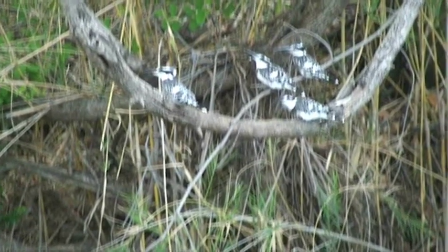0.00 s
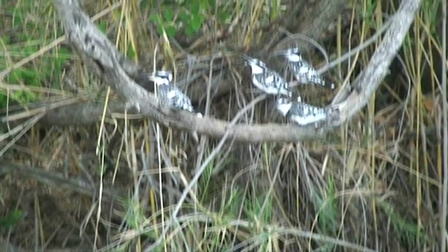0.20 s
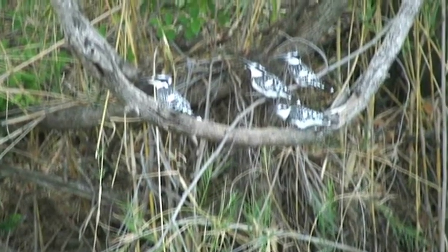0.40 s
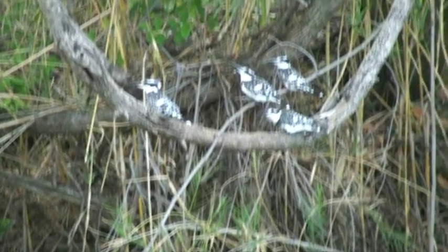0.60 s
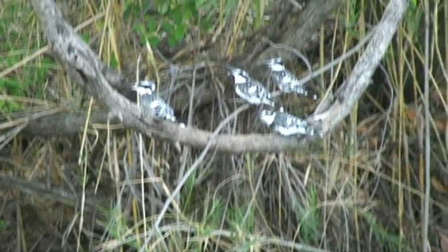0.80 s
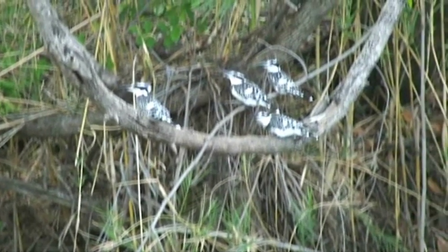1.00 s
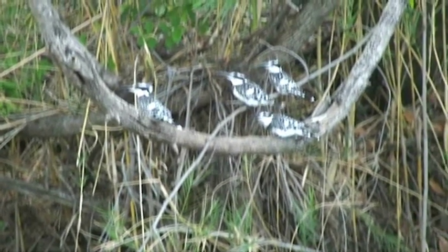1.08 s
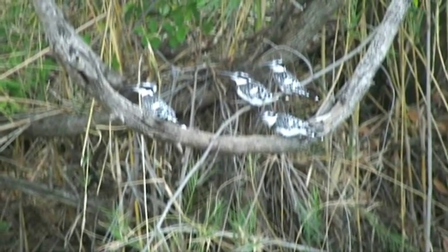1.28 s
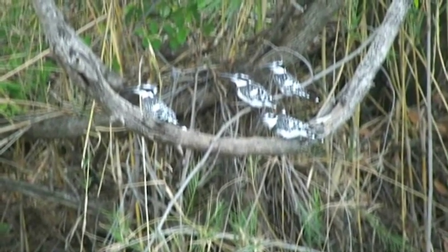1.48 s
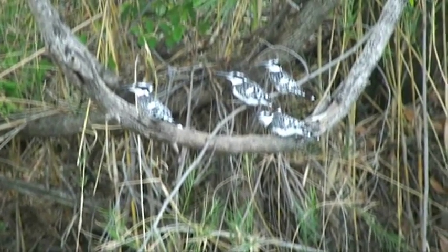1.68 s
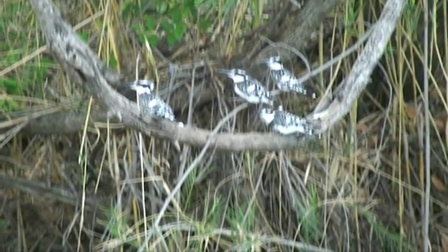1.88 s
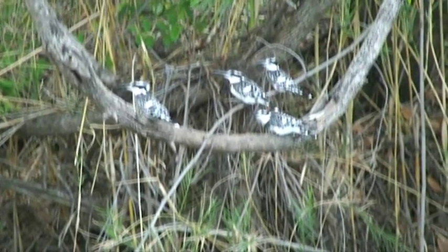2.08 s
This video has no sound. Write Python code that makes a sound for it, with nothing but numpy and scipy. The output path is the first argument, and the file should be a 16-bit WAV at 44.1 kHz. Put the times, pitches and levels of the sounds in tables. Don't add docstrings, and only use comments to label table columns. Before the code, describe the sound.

Close kingfisher's piercing chirps and rapid chips beside a rushing river, then two faint distant notes

```python
import sys
import numpy as np
from scipy import signal
from scipy.fft import rfft, irfft, next_fast_len
from scipy.io import wavfile
from scipy.ndimage import uniform_filter1d, map_coordinates

SR = 44100
rng = np.random.default_rng(int(sys.argv[2]) if len(sys.argv) > 2 else 0)


def wav_out(sig):
    wavfile.write(sys.argv[1], SR, np.round(np.clip(np.atleast_2d(sig).T, -1, 1) * 32767).astype(np.int16))


def boost_factor(decibels):
    exponent = np.asarray(decibels, float) / 20
    return 10 ** exponent


N = 97020

# f/Hz, t60/s
REEDS = [(3000, 0.2), (5000, 0.23), (10000, 0.28)]


def unit(x):
    return x / np.sqrt(np.mean(x ** 2) + 1e-20)


def along(points, hz):
    f, v = np.transpose(points)
    return np.interp(np.log(hz + 1), np.log(f + 1), v)


def wobble(rate):
    knots = rng.standard_normal(int(N * rate / SR) + 4)
    return map_coordinates(knots, [np.arange(N) * rate / SR])


def noise(gain):
    m = next_fast_len(N)
    spectrum = rfft(rng.standard_normal(m)) * gain(np.fft.rfftfreq(m, 1 / SR))
    return unit(irfft(spectrum, m)[:N])


def coloured(points):
    return noise(lambda hz: boost_factor(along(points, hz)) * (hz > points[0][0] / 2))


def resonant(centre, width):
    return noise(lambda hz: 1 / (1 + ((hz - centre) / width * 2) ** 2))


def river():
    # f/Hz, level/dB per Hz
    hiss_mid = [(200, -8), (450, -5.5), (800, -9.5), (1500, -14.5), (2600, -21), (6300, -25),
                (10000, -37.5), (15000, -57.5)]
    # f/Hz, level/dB per Hz
    hiss_side = [(200, -19), (450, -10.5), (850, -11), (1500, -17.5), (3000, -24), (6300, -28.5),
                 (10000, -36), (15000, -67)]
    # f/Hz, level/dB per Hz
    rumble = [(12, -21), (20, -1), (64, -2.5), (82, -2), (155, -1), (300, -13.5), (390, -7), (660, -120)]
    hiss = boost_factor(-42 + 0.17 * wobble(3.6)) * coloured(hiss_mid)
    low = boost_factor(-42.5 + 0.65 * wobble(5.2)) * coloured([*rumble, (600, -48.5)])
    mid = hiss + low
    side = boost_factor(-48.5) * coloured(hiss_side)
    return np.array([mid + side, mid - side])


def motor():
    # f/Hz, width/Hz, mid level/dB, side level/dB
    resonances = [
        (432, 40, -59.5, -60.5),
        (597.8, 20.4, -46.5, -53),
        (772, 67, -54.5, -56.5),
    ]
    like = -0.15
    out = np.zeros((2, N))
    for hz, width, mid_db, side_db in resonances:
        mid = resonant(hz, width)
        side = like * mid + np.sqrt(1 - like ** 2) * resonant(hz, width)
        out += boost_factor(mid_db) * mid + boost_factor(side_db) * side * [[1], [-1]]
    return out


def wind():
    # t/s, strength/dB
    gusts = [(0, -36), (.12, -45), (.35, -34), (.5, -54), (.85, -49), (1.05, -52), (1.4, -49), (1.6, -57),
             (2.2, -55)]
    # f/Hz, level/dB per Hz
    buffet = [(15, -8.5), (35, 10.5), (70, 2.5), (130, -9.5), (250, -38)]
    s, db = np.transpose(gusts)
    strength_db = np.interp(np.arange(N) / SR, s, db) - 1.5
    ports = []
    for more_db in (2, 0):
        lumps_db = 4.5 * wobble(7.55)
        ports.append(boost_factor(strength_db + more_db + lumps_db) * coloured(buffet))
    return np.array(ports)


def whistle(rows, overtones_db, flutter_db):
    # f/Hz, level/dB
    throat = [(6500, 1), (7600, 1.5), (8500, 2), (9400, -3.5), (10000, -8), (11000, -1.5), (13000, 0),
              (15000, -10)]
    overtone_grows, full_effort_db = 0.4, -12
    s, hz, db = np.transpose(rows)
    t = np.arange(N) / SR
    pitch = uniform_filter1d(np.interp(t, s, hz), size=45)
    effort_db = np.interp(t, s, db)
    level = uniform_filter1d(boost_factor(effort_db) * (t > s[0]) * (t < s[-1]), size=45)
    thin_db = overtone_grows * (effort_db - full_effort_db)
    phase = 2 * np.pi * np.cumsum(pitch) / SR
    tone = np.sin(phase)
    for k, over_db in zip((2, 3), overtones_db):
        gain = boost_factor(over_db + thin_db + along(throat, k * pitch))
        audible = k * pitch < SR / 2
        tone += gain * audible * np.sin(k * phase)
    flutter = boost_factor(flutter_db * wobble(300))
    return level * flutter * tone


def arch(s, length, hz, top, db, drop):
    u = np.linspace(0, 1, num=24)
    rising = u < top
    away = np.where(rising, 1 - u / top, (u - top) / (1 - top)) ** 2
    pitch = hz * (1 - np.where(rising, *drop) * away)
    return np.transpose([s + u * length, pitch, db - 14.5 * away])


def chip(s, length, hz, fall, db):
    # f/Hz, level/dB
    chip_throat = [(2400, -14), (3300, -13.5), (3800, -3), (4500, 0.5), (5500, -1.5), (6800, -20)]
    peak_at, rise_db, fall_db = 0.42, 3, 7.5
    u = np.linspace(0, 1, num=40)
    pitch = hz - fall * 1000 * length * (u - 0.31 * u ** 4)
    before_db = rise_db * (1 - u / peak_at) ** 4
    after_db = fall_db * (u - peak_at) / (1 - peak_at)
    level = db - np.where(u < peak_at, before_db, after_db)
    return np.transpose([s + u * length, pitch, level + along(chip_throat, pitch)])


def tail(t60s, delay_s, rise_s):
    hz, t, z = signal.stft(rng.standard_normal((2, SR // 2)), SR, nperseg=128)
    decay = boost_factor(-60 * t / along(t60s, hz)[:, None])
    x = signal.istft(z * decay, SR, nperseg=128)[1]
    late = np.clip(np.arange(x.shape[1]) / SR - delay_s, 0, None)
    x = x * (1 - np.exp(-late / rise_s))
    return x / np.linalg.norm(x[0]) * boost_factor([[0], [-9]])


def perched(x, pan, echo):
    mid, side = signal.fftconvolve(x[None], echo, axes=1)[:, :N]
    heard = x + np.array([mid + side, mid - side])
    tilt_db = along(pan, np.fft.rfftfreq(N, 1 / SR)) / 2
    return irfft(rfft(heard) * boost_factor([tilt_db, -tilt_db]), N)


def near_birds():
    # t/s, f/Hz, effort/dB
    whistle_a = [(.2355, 7120, -54), (.238, 7240, -31), (.246, 5900, -18), (.254, 4570, -12.5),
                 (.264, 4190, -11), (.277, 3880, -14), (.283, 3740, -21.5), (.309, 3600, -20),
                 (.327, 2870, -37.5)]
    # t/s, f/Hz, effort/dB
    lead_in = [(0.349, 5690, -38), (.353, 5650, -22), (0.359, 6070, -31), (0.3615, 7460, -28),
               (0.364, 7700, -28), (.365, 7400, -50)]
    # t/s, f/Hz, effort/dB
    whistle_b = [(0.364, 6520, -37), (.365, 6275, -14.5), (.369, 5540, -17), (0.372, 4754, -7.5),
                 (.381, 3800, -17), (.388, 3290, -24), (.398, 3044, -30.5), (0.411, 2950, -30),
                 (0.411, 2900, -43)]
    # start t/s, length/s, top f/Hz, top at share of length, peak level/dB
    arches = [
        (0.493, 0.0156, 4747, 0.35, -14),
        (0.659, .017, 4110, 0.42, -20),
    ]
    arch_drops = [(0.24, 0.104), (.12, 0.47)]
    # start t/s, length/s, top f/Hz, top at share of length, peak level/dB
    ticks = [
        (0.522, 0.012, 7320, .5, -33),
        (0.577, .006, 7100, 0.41, -32),
    ]
    tick_drop = (0.059, .04)
    # start t/s, length/s, first f/Hz, fall/Hz per ms, peak level/dB
    chips = [
        (.528, .026, 6025, 162.3, -12.5),
        (.579, 0.018, 5690, 232, -16.5),
        (.621, .022, 6820, 256.7, -15),
    ]
    near_overtones = [-15, -28]
    # f/Hz, level/dB
    near_pan = [(3000, -4), (5000, -2.5), (6500, -3.5), (9000, 3.5), (13000, .3)]
    # f/Hz, t60/s
    bank = [(3000, 0.57), (5000, 0.52), (10000, 0.58)]
    notes = [whistle_a, lead_in, whistle_b]
    notes += [arch(*row, drop) for row, drop in zip(arches, arch_drops)]
    notes += [arch(*row, tick_drop) for row in ticks]
    notes += [chip(*row) for row in chips]
    out = np.zeros((2, N))
    for note in notes:
        echo = boost_factor(-6) * tail(REEDS, 0.0032, 0.0052) + boost_factor(-18) * tail(bank, 0.033, 0.014)
        out += perched(whistle(note, near_overtones, -0.76), near_pan, echo)
    return out


def lap():
    start_s, length_s = 1.17, 0.21
    u = np.clip((np.arange(N) / SR - start_s) / length_s, 0, 1)
    return boost_factor(-41.5) * np.sin(np.pi * np.sqrt(u)) * resonant(173, 110)


def far_birds():
    # t/s, f/Hz, effort/dB
    call_a = [(1.345, 4200, -51), (1.364, 4250, -52), (1.371, 4580, -34), (1.374, 6310, -37),
              (1.379, 7760, -46), (1.383, 6300, -34), (1.386, 4435, -40.5), (1.402, 4200, -41),
              (1.417, 4180, -47)]
    # t/s, f/Hz, effort/dB
    octave_a = [(1.384, 10250, -52), (1.387, 8800, -43.5), (1.392, 8440, -44), (1.414, 8600, -57)]
    # t/s, f/Hz, effort/dB
    loop_b = [(1.993, 3440, -50), (2.001, 4960, -37.5), (2.005, 5710, -43), (2.009, 6450, -44),
              (2.015, 6660, -44), (2.020, 6280, -55), (2.023, 5560, -44), (2.0255, 4700, -35),
              (2.028, 4700, -46)]
    # t/s, f/Hz, effort/dB
    hook_b = [(2.027, 4800, -46), (2.031, 5080, -45), (2.036, 5060, -37), (2.044, 4750, -40),
              (2.049, 4340, -53), (2.055, 3400, -54)]
    far_overtones = [-25, -40]
    # f/Hz, level/dB
    pan_a = [(4500, -6), (7000, -7), (9000, -2)]
    # f/Hz, level/dB
    pan_b = [(5000, 3.7)]
    # f/Hz, t60/s
    far_bank = [(3000, 0.66), (5000, 0.39), (10000, 0.42)]
    out = np.zeros((2, N))
    for note, pan in [(call_a, pan_a), (octave_a, pan_a), (loop_b, pan_b), (hook_b, pan_b)]:
        echo = boost_factor(-6.5) * tail(REEDS, 0.0022, 0.0029) + boost_factor(-4) * tail(far_bank, 0.037, 0.03)
        out += perched(whistle(note, far_overtones, 4), pan, echo)
    return out


def scene():
    return river() + motor() + wind() + near_birds() + lap() + far_birds()


def top_cut(x):
    return signal.sosfilt(signal.butter(12, 15690, fs=SR, output="sos"), x)


def record(dry):
    return top_cut(dry)


dry = scene()
out = record(dry)
wav_out(out)
```